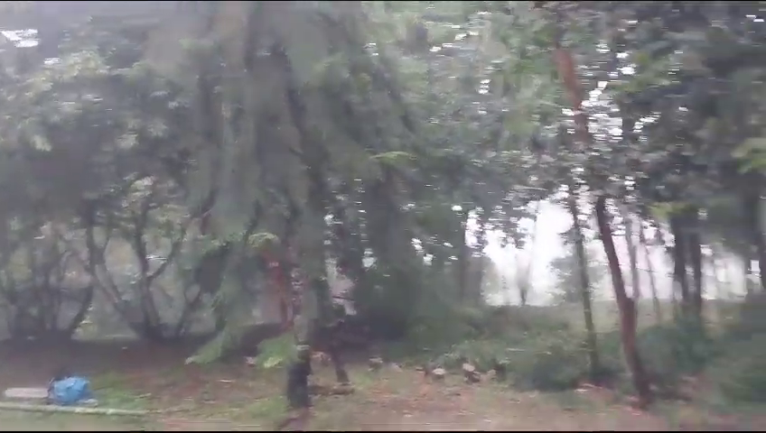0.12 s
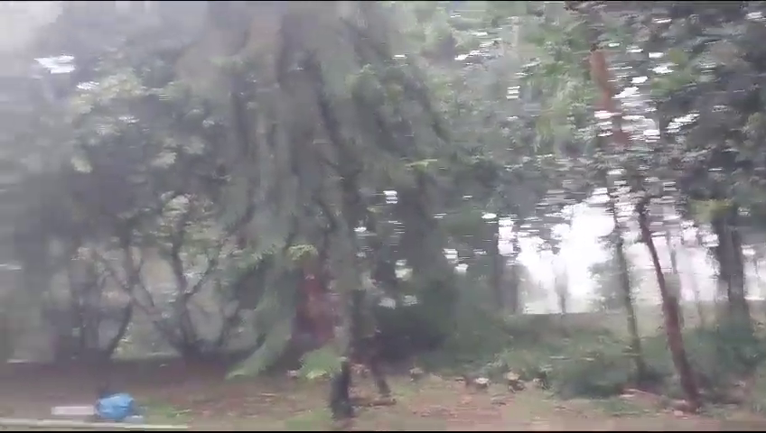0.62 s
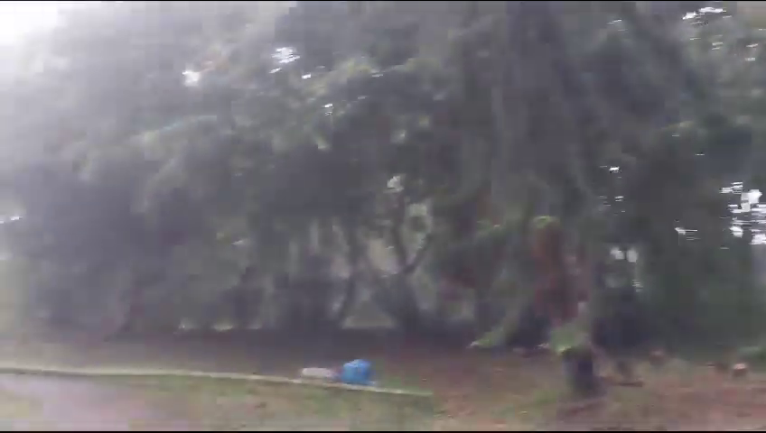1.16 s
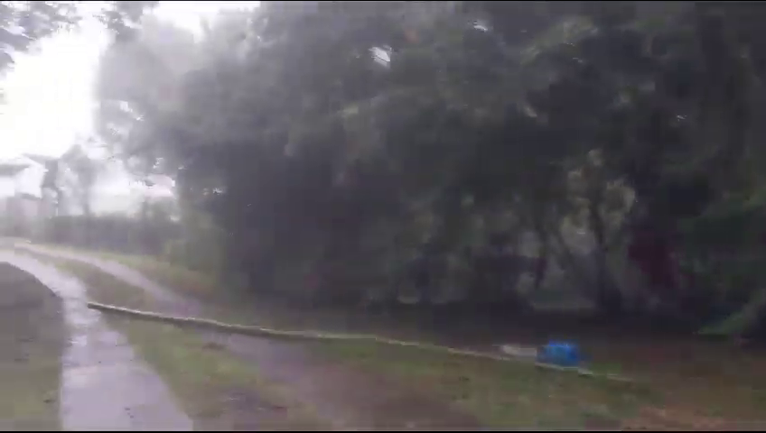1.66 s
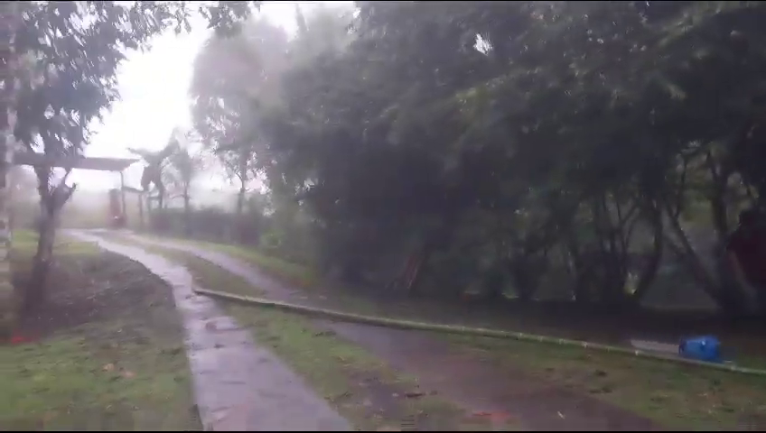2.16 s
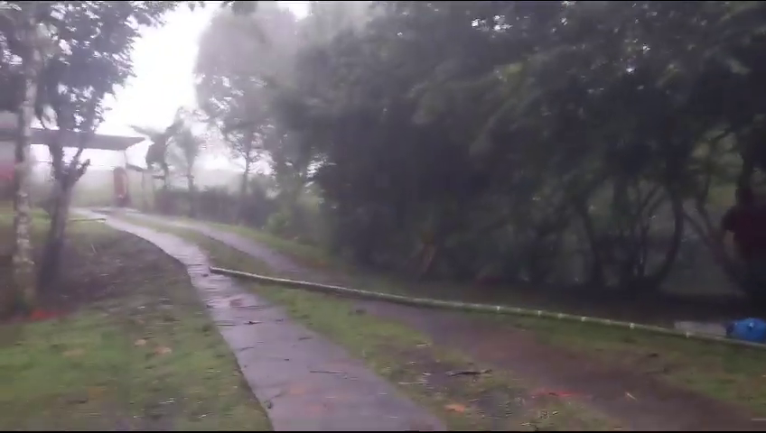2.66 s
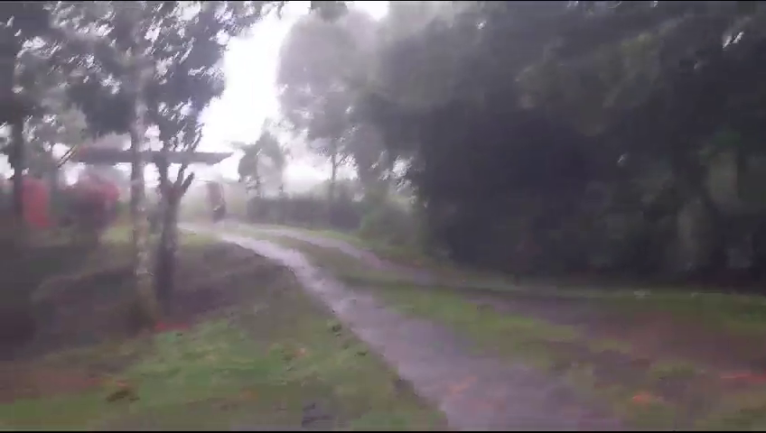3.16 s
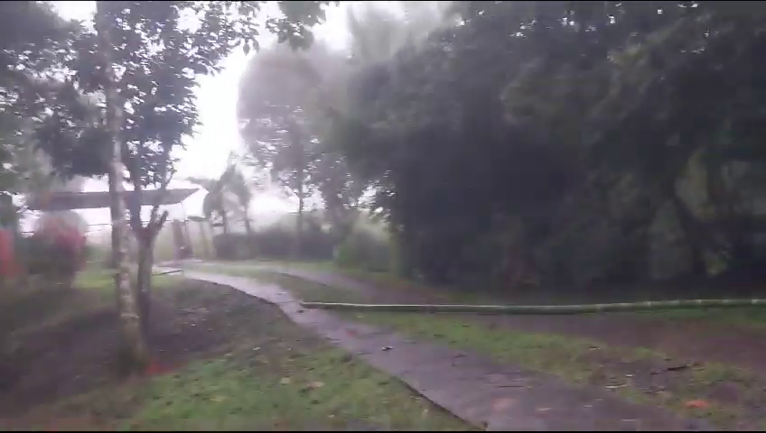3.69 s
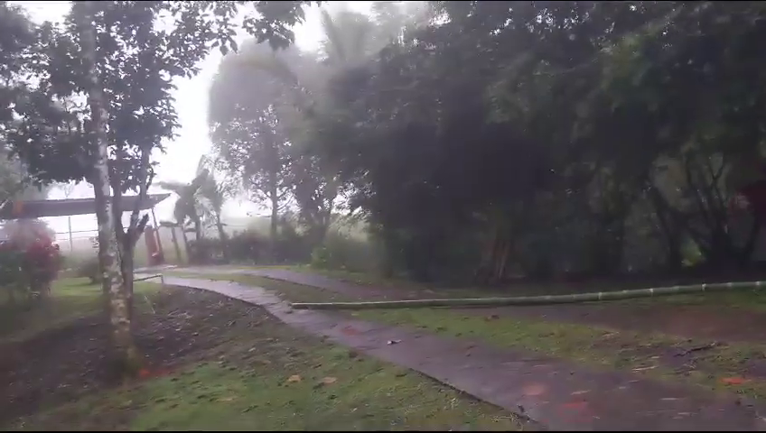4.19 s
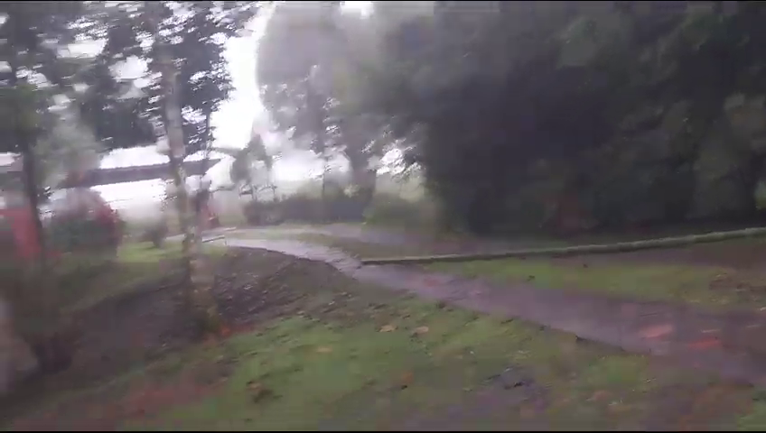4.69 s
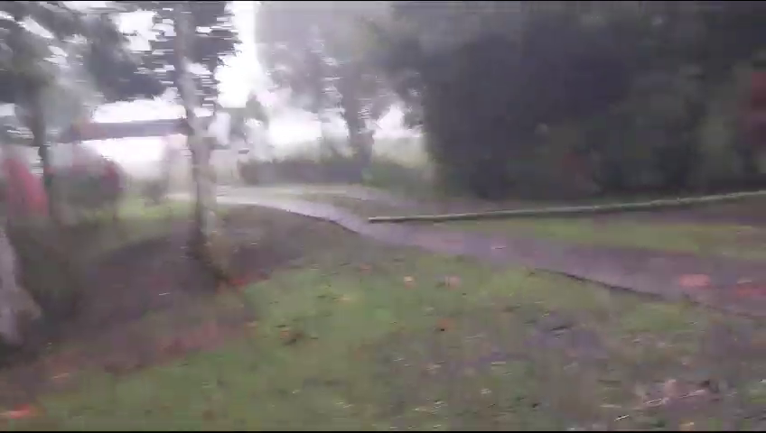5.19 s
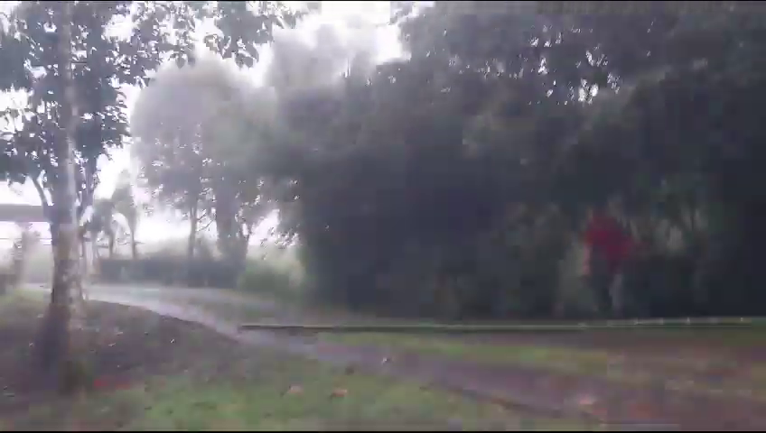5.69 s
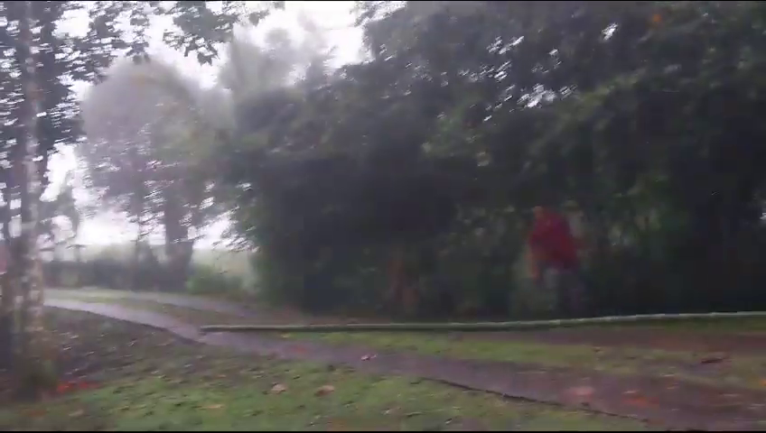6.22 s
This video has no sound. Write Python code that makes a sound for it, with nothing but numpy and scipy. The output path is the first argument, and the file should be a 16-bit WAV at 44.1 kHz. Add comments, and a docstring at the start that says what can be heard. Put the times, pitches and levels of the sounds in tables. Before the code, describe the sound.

Outdoors in a misty, wet garden, a small two-stroke chainsaw idles continuously. Its low muffler throb is broken by irregular sharp firing cracks, with casing and chain rattling at each turn. A thin high peep flickers early on, then vanishes. Light rain hisses on leaves, trees return a short echo, and a hand-held phone turns slowly, shifting the tone and stereo position.

```python
"""Chainsaw idling in wet woods

A small two-stroke chainsaw idles among wet trees, heard by a hand-held phone that slowly turns.
It fires only every few turns: a firing cracks and speeds the crank, while coasting turns just pump gas
through the ringing muffler. Casing and chain rattle with each turn, and a thin peep comes and goes.
The trees echo; light rain is a smooth hiss plus many small random drops. The ears hear the saw at a moving delay."""
import sys
import numpy as np
from scipy import signal
from scipy.fft import rfft, irfft, next_fast_len
from scipy.io import wavfile

SR = 44100
rng = np.random.default_rng(int(sys.argv[2]) if len(sys.argv) > 2 else 0)


def waveform_to_disk(signal):
    """Save audio, clipped to [-1, 1], as 16-bit WAV at the path in sys.argv[1]."""
    frames = np.transpose(np.atleast_2d(signal))
    scaled = np.clip(frames, -1, 1) * 32767
    samples = np.round(scaled).astype(np.int16)
    wavfile.write(sys.argv[1], SR, samples)


def gain_from_db(level_db):
    """Turn a decibel level (scalar or array-like) into a linear amplitude factor."""
    decades = np.asarray(level_db, float) / 20
    return 10 ** decades


N = 279594
TIME = np.arange(N) / SR
WEAK_DB = -39  # firings below this crack level hardly push the crank


def level(x, db):
    """Scale to an rms level."""
    return x * gain_from_db(db) / np.sqrt(np.mean(x ** 2))


def colour(x, points):
    """Filter by (frequency [Hz], gain [dB]) points joined on a log axis."""
    hz, db = np.transpose(points)
    size = next_fast_len(N)
    axis = np.log(np.arange(size // 2 + 1) * SR / size + 1)
    gain = gain_from_db(np.interp(axis, np.log(hz), db))
    return irfft(rfft(x, size) * gain, size)[..., :N]


def band(x, hz, width):
    """One resonance, gain 1 at the centre."""
    return signal.lfilter(*signal.iirpeak(hz, hz / width, SR), x)


def impulses(s, size):
    """Clicks at given times, shared between neighbouring samples."""
    at = np.clip(s * SR, 0, N - 2)
    i, out = at.astype(int), np.zeros(N)
    np.add.at(out, i, size * (i + 1 - at))
    np.add.at(out, i + 1, size * (at - i))
    return out


def burst(clicks, rise_ms, fall_ms):
    """Envelope that rises and dies after each click, peak near the click's size."""
    ms = np.arange(SR // 5) * 1e3 / SR
    shape = (1 - np.exp(-ms / rise_ms)) ** 2 * np.exp(-ms / fall_ms)
    return np.abs(signal.fftconvolve(clicks, shape / shape.max())[:N])


# every firing of the engine: (time [s], relative crack level [dB])
FIRING_TIMES = [(-0.0117, -40), (0.0294, -33), (0.0888, -26), (0.1452, -33), (0.208, -44), (0.2436, -37),
                (0.3027, -36), (0.3827, -35), (0.4657, -37), (0.508, -44), (0.5455, -32), (0.621, -36),
                (0.6595, -32), (0.7165, -30), (0.7873, -30), (0.8422, -32), (0.923, -41), (0.9755, -34),
                (1.05, -29), (1.1059, -27), (1.1589, -34), (1.2318, -34), (1.288, -42), (1.327, -44),
                (1.366, -41), (1.448, -44), (1.4842, -35), (1.632, -43), (1.694, -44), (1.732, -35),
                (1.848, -41), (1.8836, -36), (1.9245, -41), (2.0227, -35), (2.0838, -37), (2.1233, -37),
                (2.1815, -29), (2.2339, -36), (2.288, -40), (2.342, -32), (2.4, -40), (2.4356, -28),
                (2.56, -41), (2.618, -41), (2.7428, -35), (2.799, -40), (2.834, -41), (2.876, -41),
                (2.92, -42), (2.9571, -36), (3.018, -43), (3.053, -41), (3.0941, -36), (3.1347, -32),
                (3.1947, -36), (3.234, -43), (3.278, -36), (3.3207, -31), (3.3803, -35), (3.4206, -32),
                (3.4993, -35), (3.574, -41), (3.61, -37), (3.6643, -33), (3.7174, -28), (3.769, -41),
                (3.8047, -33), (3.8756, -35), (3.93, -31), (3.984, -37), (4.024, -41), (4.058, -38),
                (4.111, -41), (4.146, -43), (4.312, -44), (4.3497, -33), (4.404, -36), (4.4583, -34),
                (4.5129, -32), (4.567, -36), (4.64, -43), (4.693, -42), (4.7631, -32), (4.813, -40),
                (4.851, -42), (4.885, -43), (4.921, -40), (4.9566, -34), (5.009, -37), (5.044, -38),
                (5.114, -40), (5.2069, -37), (5.2627, -33), (5.393, -37), (5.522, -38), (5.6139, -33),
                (5.6823, -33), (5.7337, -33), (5.8375, -33), (5.89, -38), (5.9426, -36), (5.9955, -35),
                (6.048, -35), (6.085, -41), (6.1166, -36), (6.2903, -36)]
# idle speed hunts up and down: (time [s], crank speed [turns/s])
IDLE_SPEED = [(0, 50), (.6, 50.5), (.75, 55), (1.25, 54.5), (1.45, 49), (1.8, 47), (2.1, 51), (2.25, 55.5),
              (2.75, 54.5), (2.9, 51), (3.25, 48), (3.55, 52), (3.7, 56.5), (4.3, 54.5), (4.9, 56.5),
              (5.4, 54), (5.7, 58), (6.34, 57.5)]


def crank(slowing=0.038):
    """A firing speeds the crank and coasting slows it; gives turn starts, crack dB and turns since firing."""
    all_s, all_db = np.transpose(FIRING_TIMES)
    s = all_s[all_db > WEAK_DB]
    clock = np.arange(-SR // 10, N + SR // 10) / SR
    angle = np.cumsum(np.interp(clock, *np.transpose(IDLE_SPEED))) / SR
    at = np.interp(np.append(s, s[-1] + 3 / IDLE_SPEED[-1][1]), clock, angle)
    turns = np.round(np.diff(at)).astype(int)  # whole turns from each strong firing to the next
    owner = np.repeat(np.arange(len(s)), turns)
    since = np.arange(len(owner)) - np.repeat(np.cumsum(turns) - turns, turns)
    part = since / turns[owner]
    # coasting turns lengthen, less so the longer the coast
    turn_angle = at[owner] + np.diff(at)[owner] * part - slowing * 3 * part * (1 - part)
    start = np.interp(turn_angle, angle, clock)
    # one turn comes early and the next few drift back
    early_s, early_ms = 1.938, 6
    start = start - early_ms / 1e3 * (start > early_s) * np.exp(-np.abs(start - early_s) / .05)
    fired = np.abs(start[:, None] - all_s).argmin(axis=0)
    last = np.searchsorted(fired, np.arange(len(start)), "right") - 1
    return start, all_db[last], np.arange(len(start)) - fired[last]


# gas pushes in one turn: exhaust port opens, gas swings back, transfer ports blow through,
# ports shut, intake gulps. Coasting pushes depend on how full of leftover gas the cylinder is:
# (crank angle [degrees], push when fired [share], coasting empty [share], half [share], full [share])
PORT_PUSHES = [(16.8, 0.33, 0.4, 0.17, -0.087), (27.36, -0.093, -0.24, -0.48, -0.24),
               (36.52, 0.14, 0.13, 0.37, 0.33), (95, -0.26, -0.3, -0.094, -0.2),
               (149.5, -0.021, -0.003, -0.14, -0.12)]
# muffler and air box rings: (frequency [Hz], time to fall 60 dB [s], signed strength [share])
MUFFLER_RINGS = [(225, 0.01, 0.59), (211.7, 0.035, -1.443), (358.4, 0.019, 0.89), (674, 0.013, -0.077),
                 (817, 0.015, -0.103), (1690, 0.018, 0.17)]


def exhaust(start, crack_db, k):
    """The pushes of each turn ring the muffler; leftover pressure leaks away unevenly as the crank coasts."""
    chance = rng.standard_normal((len(start), 2 * len(PORT_PUSHES)))
    leak = rng.random(len(start))
    weak = crack_db < WEAK_DB
    # gas left in the turn after a firing; it shrinks slowly over time
    full = (1.157 - 0.027 * start) * np.where(weak, 0.87, 1)
    # leftover gas sinks to a floor over a few coasting turns
    floor, leak_turns, scatter = 0.37, 1.7, 0.79
    coast = floor + (1 - floor) * np.exp(-(k - 1) / leak_turns) + scatter * (leak - .5)
    coast = np.clip(coast, 0, 1)
    # a turn before a firing often holds a full charge, less so later
    charged = (np.roll(k, -1) == 0) & (leak > .11 * start)
    left = full * np.where((k > 1) & ~charged, coast, 1)
    pushes = 0
    for j, (degrees, fired, *coasting) in enumerate(PORT_PUSHES):
        fired_push = fired * np.where(weak, 0.72, 1)
        size = np.where(k == 0, fired_push, np.interp(left, [0, .6, 1], coasting))
        when = start + np.gradient(start) * (degrees + .4 * chance[:, 2 * j]) / 360
        pushes = pushes + impulses(when, (when > 0) * size * gain_from_db(0.72 * chance[:, 2 * j + 1]))
    t = TIME[:SR // 10]
    ring = sum(g * np.exp(-np.log(1000) * t / t60) * np.sin(2 * np.pi * hz * t)
               for hz, t60, g in MUFFLER_RINGS)
    # a port takes a moment to open, which rounds each push
    opening = signal.windows.gaussian(121, .2 * SR / 1e3)
    ring = np.convolve(ring, opening / opening.sum())
    gas = signal.fftconvolve(pushes, ring)[60:N + 60] * gain_from_db(0.76)
    throb = np.sin(2 * np.pi * (np.interp(TIME, start, np.arange(len(start))) + 0.45))
    return gas + gain_from_db(-38.5) * throb  # body rocks once a turn


# turns whose port opening snaps sharply: (time [s], peak level before a 4 dB cut [dB])
SHARP_SNAPS = [(0.185, -21), (0.224, -10), (0.424, -18), (0.506, -20), (0.603, -19), (0.939, -12),
               (0.958, -18), (1.424, -14), (1.546, -19), (1.567, -12), (1.669, -17), (1.775, -31),
               (1.981, -21), (2.598, -13), (3.175, -24), (4.184, -10)]


def snaps(start, lag_ms):
    """A few cycles crack from the outlet as its port opens: modest on every turn, loud on some."""
    s, db = np.transpose(SHARP_SNAPS)
    every = impulses(start + 0.001955, gain_from_db(-25 + 2.6 * rng.standard_normal(len(start))))
    every = every * gain_from_db(-11 * lag_ms)  # stronger while the phone faces the saw
    sharp = impulses(s + 0.00206, gain_from_db(db - 4))
    snap_hz, snap_ms = 822, 0.82
    ms = np.arange(-200, 201) * 1e3 / SR
    crack = np.exp(-(ms / snap_ms) ** 2 / 2) * np.cos(2 * np.pi * snap_hz * ms / 1e3 + 0.69)
    return signal.fftconvolve(every + sharp, crack, "same")


def shell(start):
    """Every turn strikes the muffler shell, and again about half a turn later, so its ring is rough."""
    hz, width_hz = 700, 184
    chance = rng.standard_normal((len(start), 4)).T
    when = start + 0.00195 + .0002 * chance[0]
    again = when + .0095 + 2 * .0002 * chance[1]
    blows = impulses(when, gain_from_db(3.0 * chance[2])) + impulses(again, gain_from_db(2.6 * chance[3]))
    return level(band(band(blows, hz, 3 * width_hz), hz, width_hz), -39.5)


# casing and bar rings, each swelling around the time the phone faces that part:
# (frequency [Hz], width [Hz], level [dB], time faced [s], level gained then [dB])
CASING_RINGS = [(1595, 150, -23, 0.042, 31), (1830, 85, -2.5, 2.33, 17), (2105, 460, -5.5, 3.82, 16.5),
                (1976, 450, -2, 5.71, 14.5), (1180, 67, -20.5, 1.9, 25), (2800, 38, 11, 1.17, 11.5),
                (3505, 120, 11, 12, 7), (4080, 220, -1.5, 5.56, 10), (4580, 26, 0, 3.1, 18),
                (5340, 63, 9.5, 0.59, 3.5), (5710, 59, 8.5, 0.36, 9.5), (6860, 220, -15, 6.8, 13),
                (10100, 1300, -2, 0.21, 8.5), (13100, 3000, -14, 2.3, 13)]


def metal(x, top_db):
    """Noise through the casing: ringing lines that swell while the phone faces them."""
    for hz, width, db, faced, gain_db in CASING_RINGS:
        swell_db = db + gain_db * np.exp(-((TIME - faced) / 1.2) ** 2)
        x = x + gain_from_db(swell_db) * band(x, hz, width)
    return x + (gain_from_db(top_db) - 1) * band(x, 7280, 1060)


# tone of the crack noise: (frequency [Hz], relative level [dB])
CRACK_COLOUR = [(900, 9), (1800, -1), (4270, -0.5), (7040, 7), (8550, 1), (10000, 5), (15500, 8.5)]


def cracks(start, crack_db, k, top_db):
    """Hot gas cracks out at each firing and echoes off the leaves; no two have the same colour."""
    s, db = start[k == 0], crack_db[k == 0]
    tilt_db = 2.9 * rng.standard_normal((len(s), 4)).T
    hiss = level(metal(colour(rng.standard_normal((2, N)), CRACK_COLOUR), top_db), 0)
    lows = [colour(hiss, [(hz, 0), (1.2 * hz, -40)]) for hz in (3000, 5800, 10500)]
    parts = np.diff([0 * hiss, *lows, hiss], axis=0)  # four pitch ranges
    out = 0
    for part, own_db in zip(parts, tilt_db):
        shots = impulses(s + 0.001, gain_from_db(db + own_db))
        direct = gain_from_db(2.5) * burst(shots, 1.24, 3.1)
        echo = np.sqrt(gain_from_db(-47.0) * burst(shots, 7.9, 30))
        out = out + part * (direct + echo)
    return out


def knock(start, crack_db, k):
    """The cylinder pings briefly at each firing, a little off pitch every time."""
    s, db = start[k == 0], crack_db[k == 0]
    chance = rng.standard_normal((len(s), 2)).T
    last = np.clip(np.searchsorted(s, TIME) - 1, 0, None)
    since = np.maximum(TIME - s[last], 0)
    ping = (1 - np.exp(-since / 0.0012)) * np.exp(-np.log(1000) * since / 0.012)
    hz = 4640 * (1 + 0.043 * chance[0])
    ping_db = db + 6 - 1.5 * s + 4.5 * chance[1]  # fades by 1.5 dB per second
    return gain_from_db(ping_db)[last] * ping * np.sin(2 * np.pi * hz[last] * since)


def rattle(start, k, top_db, echo_ms):
    """Piston, clutch and chain knock once a turn, harder at a firing, and come again off the wet ground."""
    db = 1.8 * rng.standard_normal(len(start)) + 4 * (k == 0)
    knocks = burst(impulses(start - .002, gain_from_db(db)), 2.2, 5.7) + 0.5  # 0.5 keeps a steady noise below
    dull = colour(rng.standard_normal(N), [(400, 15), (750, 10.5), (1200, 9.0), (2200, -12.0),
                                           (4000, -13.5), (7000, -19.5), (9500, -39)])
    near = level(metal(knocks * dull, top_db), -34)
    return near + 0.32 * np.interp(TIME - echo_ms / 1e3, TIME, near)


# the peep comes and goes: (time [s], level before each turn's random cut [dB])
PEEP_LEVEL = [(0, -43), (.12, -30), (.27, -38), (.55, -34), (.85, -40), (1.12, -31), (1.3, -46), (1.8, -55)]


def whistle(start):
    """Air through a narrow gap gives a short rising peep as each turn begins."""
    turn = np.interp(TIME, start, np.arange(len(start))) + .55
    scatter = rng.random((len(start) + 1, 2)) * (9, 300)  # up to 9 dB softer and 300 Hz higher
    scatter_db, off_hz = scatter[turn.astype(int)].T
    part = turn % 1 - .5
    tone = np.sin(2 * np.pi * np.cumsum(5110 + off_hz + 1100 * part) / SR)
    peep = gain_from_db(-scatter_db) * np.exp(-(part / .17) ** 2) * tone
    return gain_from_db(np.interp(TIME, *np.transpose(PEEP_LEVEL))) * peep


def trees(x, t60=.4):
    """Diffuse echo off trunks and ground, from two noise tails; their mix changes as the phone moves."""
    t = TIME[:int(.4 * SR)]
    tails = rng.standard_normal((2, len(t))) * np.exp(-np.log(1000) * t / t60) * (t > .004)
    drift = 2 * np.pi * 0.307 * TIME
    x = colour(x, [(100, -32), (300, 5.0), (700, 17.0), (1500, -4.0)])
    x = x * np.array([np.cos(drift), np.sin(drift)])
    return signal.fftconvolve(x, tails / np.linalg.norm(tails[0]), axes=1)[:, :N].sum(axis=0)


# tone of the rain: (frequency [Hz], relative level [dB])
RAIN_COLOUR = [(700, -56), (1400, 9.5), (4000, 0), (7040, 2), (8450, -6.5), (10500, -1), (15500, 0.5)]


def rain():
    """Dense small drops on leaves over a smooth hiss, unrelated left and right."""
    size_db = np.minimum(2.0 * rng.exponential(size=(2, N)), 12)
    falls = rng.random((2, N)) < 1500 / SR  # about 1500 drops per second at each ear
    drops = falls * gain_from_db(size_db) * rng.standard_normal((2, N))
    hiss = rng.standard_normal((2, N))
    return level(colour(level(drops, -0.75) + hiss, RAIN_COLOUR), -40)


# the phone turns and the muffler swings round:
# (time [s], delay of the left ear [ms], exhaust level [dB], brightness around 7 kHz [dB])
PHONE_TURN = [(0, -0.2, 1, -4), (.75, -0.18, 1, 8), (1.5, 0.11, 1, 10.5), (2.25, 0.23, 1.5, 8.5),
              (3.5, 0.32, 2, 12), (5, 0.37, 3.5, 10), (5.75, 0.31, 3, 11.5), (6.34, 0.32, 4.5, 11)]
# tone of everything at the left ear: (frequency [Hz], gain [dB])
LEFT_EAR_COLOUR = [(100, -1.5), (380, -0.5), (700, -3), (1290, -4), (2380, -4.5), (4400, 1), (8120, -7.5),
                   (15000, -10.5)]


def scene():
    """Saw, echo and rain at two ears; the left one is shaded and hears the saw at a moving delay."""
    s, *columns = np.transpose(PHONE_TURN)
    lag_ms, near_db, top_db = (np.interp(TIME, s, c) for c in columns)
    start, crack_db, k = crank()  # k counts the turns since a firing
    gas = exhaust(start, crack_db, k) * gain_from_db(near_db)
    # the more the muffler points here, the thinner its bass
    bass = colour(gas, [(65, 7.5), (110, 6.5), (220, 9.0), (330, 0.0)])
    gas = gas + (gain_from_db(0.1 - 0.64 * near_db) - 1) * bass
    # outlet pipe, heard as it points here
    gas = gas + gain_from_db(-9.5 + 2.5 * near_db) * band(gas, 483.6, 52)
    gas = gas + gain_from_db(near_db) * shell(start)
    gas = gas + snaps(start, lag_ms)
    echo = gain_from_db(-17) * trees(gas)
    saw = gas + echo + whistle(start) + knock(start, crack_db, k)
    # the ground echo of the rattle follows the phone's turning
    saw = saw + rattle(start, k, top_db, 1.233 + 0.27 * lag_ms)
    # the muffler is quiet between its low and upper rings
    saw = saw - 0.35 * band(saw, 527, 59)
    # a band near 1.1 kHz sinks as the phone turns away
    saw = saw - np.clip(1.23 * lag_ms, 0, .9) * band(saw, 1125, 154)
    ears = np.array([np.interp(TIME - side * lag_ms / 2e3, TIME, saw) for side in (1, -1)])
    # some echo reaches the two ears with opposite sign
    ears = ears + gain_from_db(-24.5) * trees(gas) * np.array([[1], [-1]])
    both = ears + cracks(start, crack_db, k, top_db) + rain()
    return np.array([colour(both[0], LEFT_EAR_COLOUR), both[1]])


def top_cut(x):
    """Nothing passes above the cut-off."""
    return signal.sosfilt(signal.butter(12, 17000, fs=SR, output="sos"), x)


def record(dry):
    """The phone cuts the deep bass below 43 Hz and the top above 15750 Hz."""
    cut = signal.butter(4, 43, "high", fs=SR, output="sos")
    top = signal.ellip(10, .2, 40, 15750, fs=SR, output="sos")
    without_bass = signal.sosfiltfilt(cut, dry)
    finished = signal.sosfilt(top, without_bass)
    return top_cut(finished)


dry = scene()
out = record(dry)
waveform_to_disk(out)
```